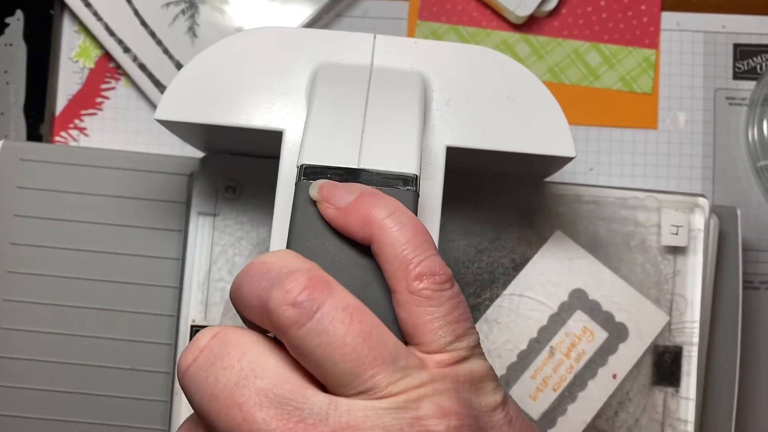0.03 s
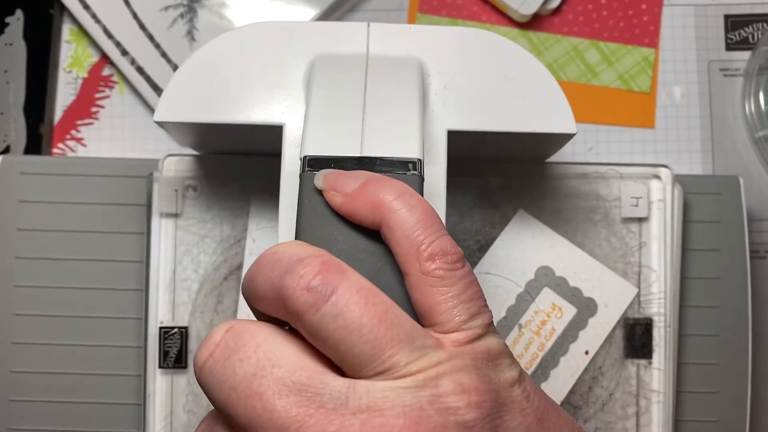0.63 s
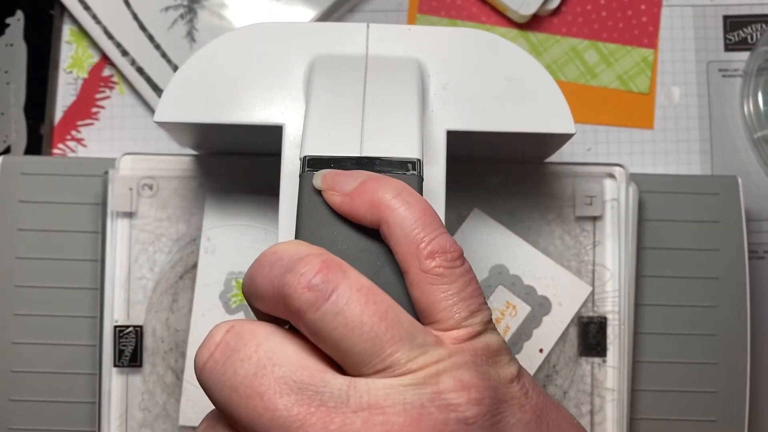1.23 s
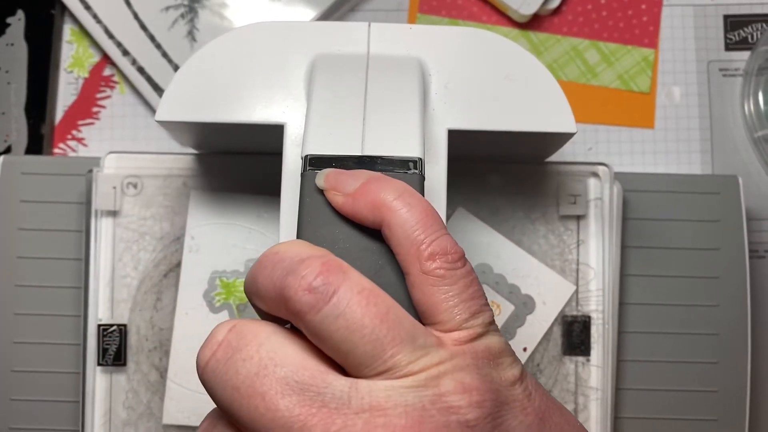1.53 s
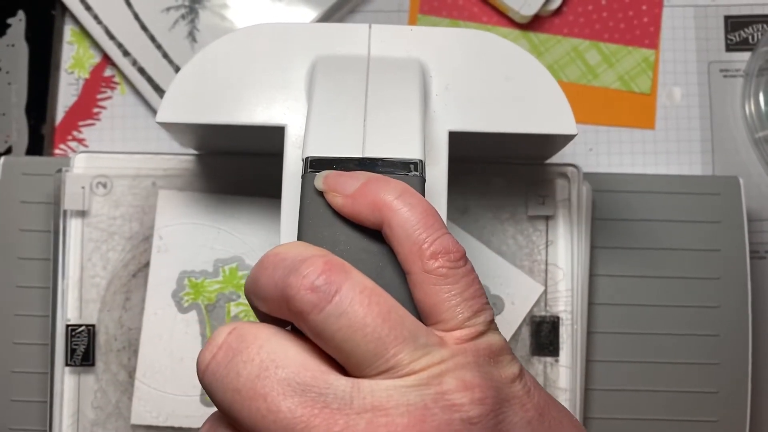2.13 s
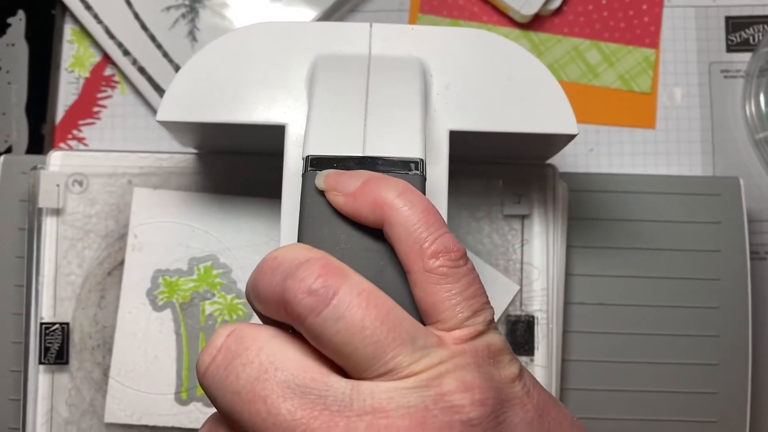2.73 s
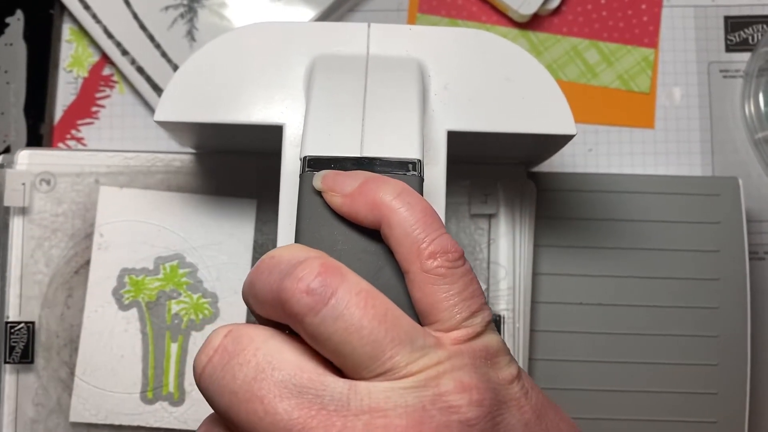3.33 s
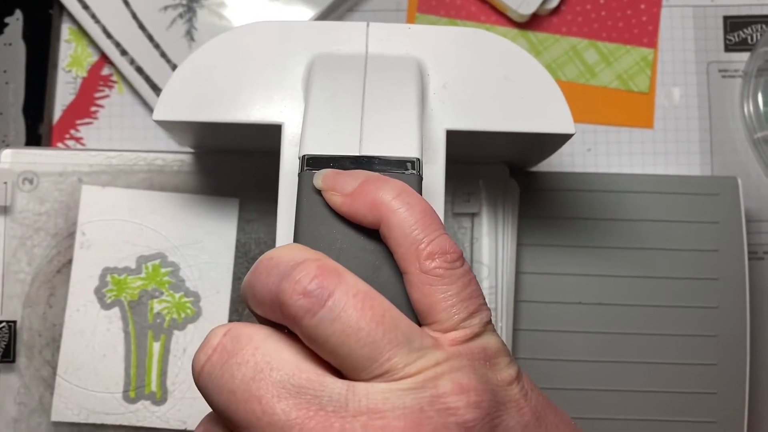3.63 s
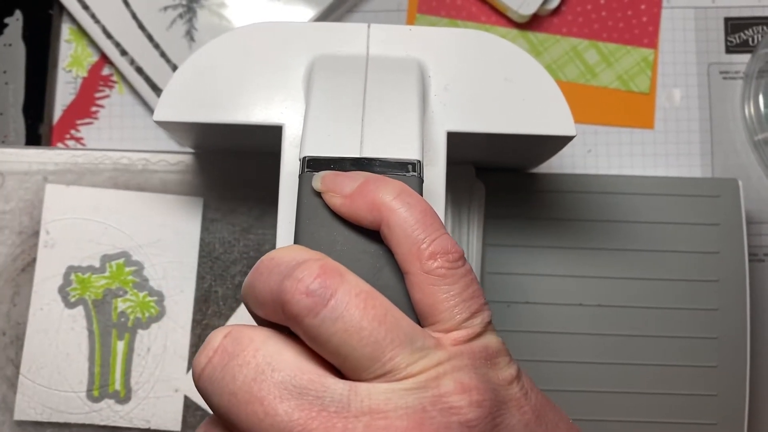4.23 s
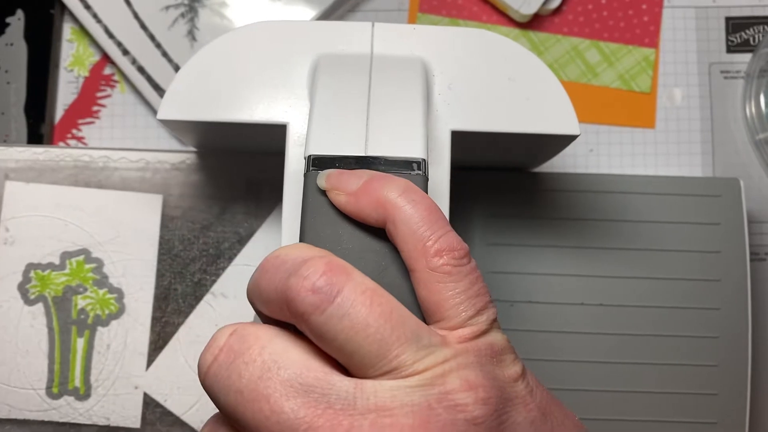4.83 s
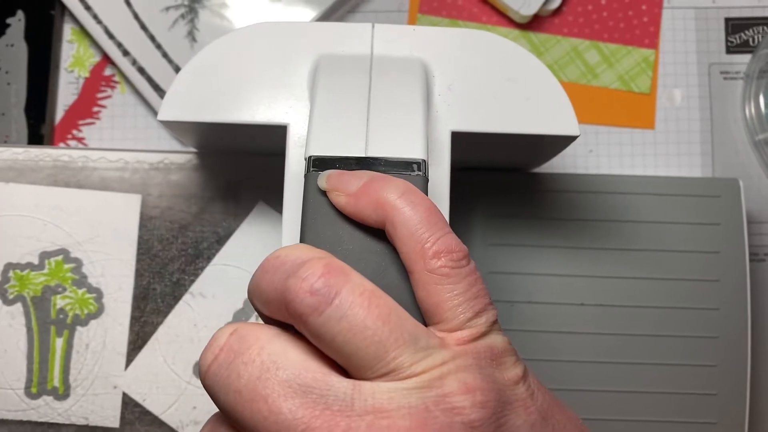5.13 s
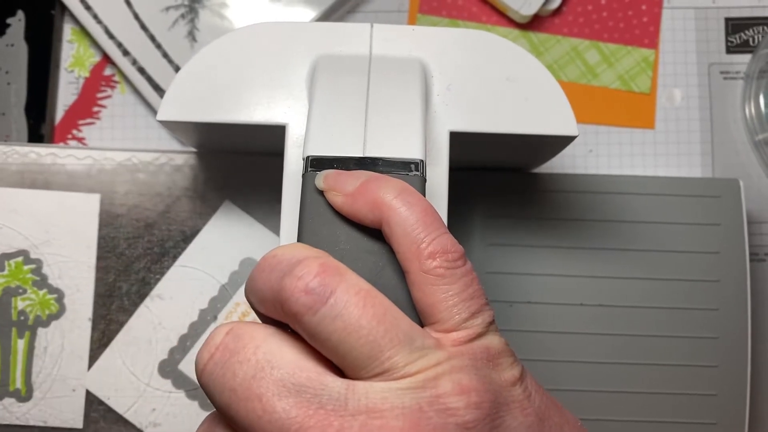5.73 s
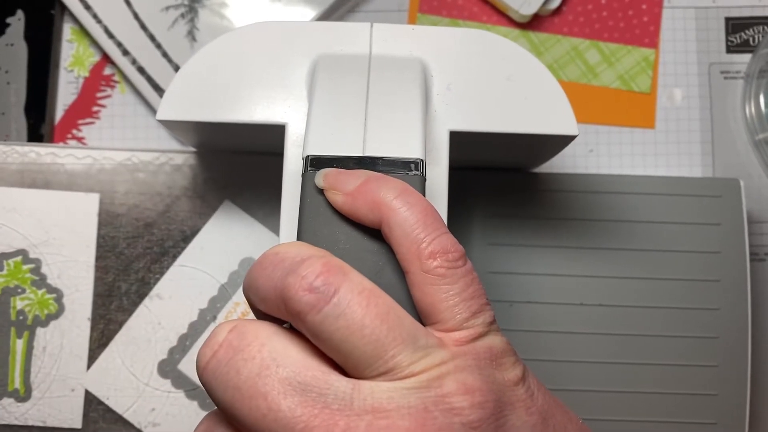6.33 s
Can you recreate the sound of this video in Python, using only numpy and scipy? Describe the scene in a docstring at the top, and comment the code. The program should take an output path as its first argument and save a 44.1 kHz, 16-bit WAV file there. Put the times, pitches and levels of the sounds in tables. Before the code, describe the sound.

A hand-cranked die-cutting machine works close to the microphones in a small, softly reflecting room. From the start its rollers give a low, uneven rumble, and the gear teeth tap and ring in short runs with each push of the crank. A stack of plastic plates slides over the bed with a faint hiss, giving scattered dry ticks and brief creaks. After a lighter knock at 0.8 seconds, the stack clunks hard against the housing at about 1.1 seconds. A quieter stretch of rumbling, ticking and small knocks follows, with a dull rub near 3.5 seconds. The loudest clunk lands at 4.6 seconds with a bright metallic snap, and another heavy one comes at 5.4 seconds. Sharper ticks continue, and the rumble is strongest at the very end, around 6.5 seconds.

```python
"""A hand-cranked die-cutting machine on a craft table in a small room, close to a pair of microphones.
From the start the rollers rumble, a stack of plastic plates slides over the bed and the gear teeth ring
one after another, while the squeezed plastic ticks and creaks. As the steel dies and the plate ends pass
the nip, the stack clunks against the housing: hard at about 1.1 s, hardest at 4.6 s, again at 5.4 s.
The rumble is strongest at the very end, and the walls answer softly throughout."""
import sys
import numpy as np
from scipy import signal
from scipy.fft import rfft, irfft, next_fast_len
from scipy.io import wavfile
from scipy.ndimage import uniform_filter1d, map_coordinates

SR = 44100
rng = np.random.default_rng(int(sys.argv[2]) if len(sys.argv) > 2 else 0)


def put_to_file(sound):
    """Save the sound as 16-bit audio at rate SR, in the file named by the first command-line argument."""
    columns = np.atleast_2d(sound).T  # one column per channel
    safe = np.clip(columns, -1, 1)
    whole_steps = np.round(safe * 32767)
    wavfile.write(sys.argv[1], SR, whole_steps.astype(np.int16))


N = 285970
AGE = np.arange(SR // 2) / SR  # seconds since a contact

# modes of the housing on the table: pitch_hz, level_db, t60_s
HOUSING_MODES = [(62, -19, .3), (92, -12.5, 0.13), (165.9, 1.5, 0.31), (208.6, -6, 0.22),
                 (230.6, -6.5, 0.18), (287.2, 2.5, 0.17), (366, -16.5, 0.27), (450.6, -2, 0.1),
                 (562.2, -7.5, 0.54), (594, 3, 0.12)]
# modes of the squeezed plastic: pitch_hz, level_db, t60_s
PLASTIC_MODES = [(1150, -7, .012), (1450, -2, .012), (1780, 0, .015), (2200, -2, .012), (3300, -6, .008),
                 (5900, -11, .01)]
# the plates' slide over the bed, with a lull at each turn of the crank: time_s, level_db
SLIDE_LEVELS = [(0, -60.5), (0.17, -69.5), (0.5, -74.5), (0.66, -73.5), (1.05, -71), (1.27, -97.5),
                (1.48, -71.5), (1.8, -78.5), (2.14, -88.5), (2.28, -68.5), (2.6, -79.0), (2.7, -65.5),
                (3.0, -79), (3.18, -84), (3.35, -66.5), (3.7, -76.5), (3.95, -76.0), (4.17, -83),
                (4.3, -71.5), (4.55, -66), (4.9, -73.5), (5.08, -66.5), (5.3, -80), (5.6, -67.5),
                (5.95, -69), (6.22, -84), (6.36, -72), (6.48, -77)]
# spectrum of a clack of the plates: frequency_hz, level_db
CLACK_SPECTRUM = [(200, -23.5), (430, 1), (600, -1.5), (950, 7), (1300, -1.5), (1850, 0), (2500, -7.5),
                  (3200, -3.5), (4000, -9), (8000, -19), (16000, -52.5)]
# spectrum of a bright snap: frequency_hz, level_db
SNAP_SPECTRUM = [(500, -30), (2000, -6), (3100, -4), (4200, -9), (5800, -6), (6500, -1), (7200, 2),
                 (8400, -15), (9700, -9), (10600, -1), (12000, -20), (14500, -17), (16000, -32)]
# spectrum of a dry tick in the plastic: frequency_hz, level_db
TICK_SPECTRUM = [(200, -21.5), (600, -5), (1100, -5.5), (2000, -2), (3700, 2), (5000, -3.5), (7000, -9.5),
                 (8500, -29), (16000, -31)]


def amp(db):
    """Decibels to gain."""
    return 10 ** (np.asarray(db) / 20)


def unit(x):
    """Scaled to rms 1."""
    return x / np.sqrt(np.mean(x ** 2) + 1e-20)


def crest(x, size):
    """Scaled so that its loudest stretch of size samples has rms 1."""
    return x / np.sqrt(uniform_filter1d(x ** 2, size, mode="constant").max() + 1e-20)


def along(points, hz):
    """Interpolate (frequency_hz, value) points on a log axis."""
    frequencies, values = np.transpose(points)
    return np.interp(np.log(hz + 1), np.log(frequencies + 1), values)


def curve(points):
    """Interpolate (time_s, value) points at every sample."""
    return np.interp(np.arange(N) / SR, *np.transpose(points))


def wobble(rate):
    """A smooth random curve, rate knots a second."""
    return map_coordinates(rng.standard_normal(int(N * rate / SR) + 4), [np.arange(N) * rate / SR])


def swells(rows, attack_s, release_s):
    """Gain of (start_s, length_s, level_db) events: each rises, holds and dies away."""
    t = np.arange(N) / SR
    return sum(amp(db) * np.exp(-np.maximum(s - t, 0) / attack_s - np.maximum(t - s - hold, 0) / release_s)
               for s, hold, db in rows)


def filtered(x, response):
    """x through a complex frequency response."""
    size = next_fast_len(x.shape[-1] + 8192)
    return irfft(rfft(x, size) * response(np.fft.rfftfreq(size, 1 / SR)), size)[..., :x.shape[-1]]


def shaped(x, spectrum):
    """x through a causal filter of the given spectrum, at rms 1."""
    def response(hz):
        cepstrum = irfft(np.log(amp(along(spectrum, hz))))
        half = len(cepstrum) // 2
        return np.exp(rfft(np.r_[cepstrum[0], 2 * cepstrum[1:half]], 2 * half))
    return unit(filtered(x, response))


def softened(x, corner_hz):
    """A soft contact passes nothing much above its corner."""
    return signal.lfilter(*signal.butter(2, min(corner_hz, SR / 3), fs=SR), x)


def rise(seconds):
    """A contact takes a moment to build up its force."""
    return 1 - np.exp(-(AGE / seconds) ** 2)


def fade(t60):
    """Free decay after a contact, 60 dB in t60 seconds."""
    return np.exp(-np.log(1000) * AGE / t60)


def ring(modes, scatter_db):
    """The modes of a struck part, at new strengths for every blow."""
    return sum((-1) ** k * amp(db + scatter_db * rng.standard_normal())
               * fade(t60) * np.sin(2 * np.pi * hz * AGE) for k, (hz, db, t60) in enumerate(modes))


def burst(spectrum, t60, tail_db, tail_t60):
    """Dense unresolved modes: a fast first decay and a weaker long one."""
    return shaped(rng.standard_normal(len(AGE)) * (fade(t60) + amp(tail_db) * fade(tail_t60)), spectrum)


def grains(rate, spread):
    """Random tiny contacts of uneven size, rate a second."""
    return (rng.random(N) < rate / SR) * rng.standard_normal(N) * np.exp(spread * rng.standard_normal(N))


def add(track, s, sound):
    """Lay a sound into a track at s seconds."""
    start = max(0, round(s * SR))
    span = track[start:start + len(sound)]
    span += sound[:len(span)]


def rollers():
    """Small bumps under the rollers shake the housing; the table sways, more when the hand bears down."""
    # rumble from the load on the rollers: time_s, level_db
    load = [(0, -47.5), (0.3, -53), (0.75, -48.5), (1.0, -49.5), (1.5, -51), (1.8, -60.0), (2.15, -50),
            (2.55, -57.5), (3.0, -55.5), (3.45, -48.0), (3.72, -52.5), (4.05, -52.5), (4.5, -47),
            (4.8, -44), (5.25, -47), (5.6, -42), (6.0, -51), (6.25, -50), (6.48, -37.5)]
    # spectrum of the grinding rollers: frequency_hz, level_db
    grind_spectrum = [(25, -20.5), (55, -1), (110, -8.5), (165, -0.5), (220, 0), (290, -9.5), (450, -7),
                      (620, -12), (800, -18.5), (1300, -36), (2500, -63)]
    # the hand bearing down: start_s, length_s, level_db
    heaves = [(.36, 0.053, -48.5), (2.79, 0.063, -49), (3.96, 0.051, -50), (4.63, 0.09, -38),
              (5.46, 0.59, -52.5), (6.4, .04, -50)]
    # spectrum of the swaying table: frequency_hz, level_db
    sway_spectrum = [(25, -31.5), (45, -12.5), (60, 0.5), (78, -14), (98, 11), (120, -3.5), (200, -32),
                     (400, -75.5)]
    rumble_db = curve(load)
    bumps = grains(rate=160, spread=.2) * amp(2.5 * wobble(18))
    ringing = signal.fftconvolve(bumps, ring(HOUSING_MODES, scatter_db=0))[:N]
    # soft bumps favour the low modes
    shaken = shaped(ringing, [(90, -9), (165, 0), (215, -6), (290, -5.5), (600, -6), (1500, -25)])
    grind = amp(-7 + 2.5 * wobble(25)) * shaped(rng.standard_normal(N), grind_spectrum)
    sway_gain = np.hypot(amp(rumble_db - 11.5), swells(heaves, attack_s=.04, release_s=.05))
    sway = sway_gain * shaped(rng.standard_normal(N), sway_spectrum)
    return amp(rumble_db - 2) * (shaken + grind) + sway


def sliding():
    """The plates hiss over the bed on thousands of tiny contacts a second."""
    # spectrum of the hiss: frequency_hz, level_db
    hiss_spectrum = [(300, -1), (900, 10), (1900, -2), (2300, 2.5), (2800, -5), (4800, -8.5), (5400, -9.5),
                     (5900, -14), (7200, -15), (8500, -23.5), (10500, -9), (12000, -35), (14500, -12.5),
                     (16000, -28.5)]
    hiss = amp(1.2 * wobble(33)) * shaped(grains(rate=6000, spread=.2), hiss_spectrum)
    return amp(curve(SLIDE_LEVELS) + 4) * hiss


def grit(per_second=11):
    """Faint dull ticks come at random, following the level of the sliding."""
    out = np.zeros(N)
    slide_db = curve(SLIDE_LEVELS)
    for i in np.flatnonzero(rng.random(N) < per_second / SR):
        crack = crest(burst(TICK_SPECTRUM, t60=.012, tail_db=-8, tail_t60=.06), size=45)
        hollow = crest(ring(PLASTIC_MODES, scatter_db=4), size=45)
        add(out, i / SR, amp(slide_db[i] + 9 + 3 * rng.standard_normal()) * (crack + hollow))
    return softened(out, corner_hz=3200)


def teeth(plate_ticks):
    """(start_s, level_db) of each gear jolt: an even pace through each push, and one at each tick."""
    # pushes on the crank: first_tooth_s, last_tooth_s, tooth_count, first_db, last_db
    pushes = [(0.014, 0.276, 4, -41.5, -46.5), (0.461, 0.679, 4, -53.5, -53.5),
              (1.43, 1.722, 6, -53, -59.5), (1.908, 2.217, 5, -59, -42), (2.33, 2.932, 9, -62.5, -64),
              (3.072, 3.248, 4, -49, -48), (3.277, 3.307, 2, -41, -40.5), (3.376, 3.497, 3, -56, -53.5),
              (3.897, 4.326, 9, -45.5, -52.5), (4.971, 5.106, 4, -45.5, -49), (5.19, 5.369, 4, -56, -48.5),
              (5.581, 5.83, 5, -43.5, -52.5)]
    jitter_s, scatter_db = .002, 1.2
    hard_tick_db, hard_jolt_db = -31, -44.5  # weaker ticks jolt the gears far less
    meshing = np.vstack([np.linspace((first_s, first_db), (last_s, last_db), round(count))
                         for first_s, last_s, count, first_db, last_db in pushes])
    meshing += rng.standard_normal(meshing.shape) * [jitter_s, scatter_db]
    return list(meshing) + [(s, hard_jolt_db + 1.3 * (db - hard_tick_db)) for s, db, _ in plate_ticks]


def gears(plate_ticks):
    """Each tooth taps, nudges the housing and, loading up, rings the gears at a slightly new pitch."""
    # modes of the gear train: pitch_hz, level_db, t60_s
    gear_modes = [(614, 0, .06), (592, -25, .24), (668, -12, .05), (965, -22, .06)]
    out = np.zeros(N)
    for s, db in teeth(plate_ticks):
        detune = 1 + .018 * rng.standard_normal()
        tone = sum(amp(level) * fade(t60) * np.sin(2 * np.pi * hz * detune * AGE)
                   for hz, level, t60 in gear_modes)
        loaded = crest(tone * rise(.02), size=450)
        contact = burst(CLACK_SPECTRUM, t60=.022, tail_db=-24, tail_t60=.22) * rise(.003)
        tap = crest(softened(contact, corner_hz=1500), size=110)
        housing = ring(HOUSING_MODES, scatter_db=2) * rise(.004)
        nudge = crest(softened(housing, corner_hz=400), size=450)
        add(out, s, amp(db) * (loaded + amp(-10.5) * tap + amp(-11.5) * nudge))
    return out


def ticks(plate_ticks):
    """The squeezed plastic lets go in short dry ticks, each followed by a weaker slip as it settles."""
    # spectrum of a tick's sharp edge: frequency_hz, level_db
    edge_spectrum = [(2000, -25), (6500, -3), (8400, -8), (9400, 0), (11000, 0), (12000, -10), (13500, 0),
                     (15000, -3), (16000, -14)]
    out = np.zeros(N)
    for s, tick_db, edge_db in plate_ticks:
        settle_s = .022 * rng.uniform(.44, 2)
        settle_db = -18.5 + 2 * rng.standard_normal()
        for delay_s, drop_db in [(0, 0), (settle_s, settle_db)]:
            crack = crest(burst(TICK_SPECTRUM, t60=.0097, tail_db=-6, tail_t60=.075), size=45)
            hollow = crest(ring(PLASTIC_MODES, scatter_db=4), size=45)
            edge = crest(burst(edge_spectrum, t60=.006, tail_db=-16, tail_t60=.07), size=45)
            tick = amp(tick_db - 4.5) * (crack + amp(-10) * hollow) + amp(edge_db + 3.5) * edge
            add(out, s + delay_s, amp(drop_db) * tick)
    return out


def creaks():
    """The stack creaks in quick uneven slips as the rollers squeeze it."""
    # squeezes that creak: start_s, length_s, level_db
    squeezes = [(.068, 0.013, -56), (.275, 0.047, -59), (.348, 0.024, -52), (2.22, .05, -64),
                (3.26, 0.026, -61.5)]
    slips = grains(rate=4400, spread=.45) * amp(1.5 * wobble(88))
    squeak = unit(signal.fftconvolve(slips, ring(PLASTIC_MODES, scatter_db=1))[:N])
    crackle = amp(-5.5) * shaped(slips, SNAP_SPECTRUM) + amp(-8) * shaped(slips, TICK_SPECTRUM)
    return swells(squeezes, attack_s=.006, release_s=.028) * (squeak + crackle)


def bend(x, lag_s, corner_hz):
    """Bending waves carry the treble first and the bass last, so each blow chirps downward."""
    return filtered(x, lambda hz: np.exp(-2j * np.pi * lag_s * corner_hz * np.arctan(hz / corner_hz)))


def knocks():
    """Each blow thumps the housing and clacks the plates; hard ones are brighter and snap the die."""
    # blows of the stack on the housing: start_s, thud_db, clack_db, snap_db
    blows = [(0.344, -50, -43, -67), (.818, -36, -43, -86), (1.0652, -42, -34.5, -33),
             (1.0785, -28, -26.5, -24), (1.108, -33.5, -45.5, -31), (1.131, -40.5, -35, -51),
             (1.168, -49, -49, -69), (1.278, -39.5, -41.5, -96), (1.546, -39.5, -57.5, -68),
             (1.841, -50, -68.5, -78.5), (2.065, -56.5, -52, -105), (2.151, -52, -43.5, -95.5),
             (2.221, -45.5, -47, -49), (2.495, -47.5, -68, -67), (2.632, -48, -53.5, -64),
             (3.503, -44.5, -62, -68), (3.952, -38, -67, -77), (4.33, -41.5, -58, -79),
             (4.597, -24, -38, -45), (4.612, -45.5, -21, -23), (4.6144, -21.5, -24.5, -15.5),
             (4.627, -50, -30, -48), (5.068, -40, -43.5, -89.5), (5.428, -38.5, -42, -66),
             (5.4489, -19.5, -23, -31), (5.708, -44.5, -46, -67), (5.88, -42.5, -49, -56),
             (6.397, -43, -58, -77), (6.453, -35, -44, -57)]
    # modes of the plate stack: pitch_hz, level_db, t60_s
    stack_modes = [(775, -12, .08), (974, 0, .14), (1170, -11, .1), (1428, -5, .09), (1725, -7, .09),
                   (1855, -1, .11), (2265, -8, .1)]
    # modes of the steel die: pitch_hz, level_db, t60_s
    die_modes = [(6620, -3, .06), (6950, -2, .035), (7130, 0, .04), (7350, -4, .035), (10020, -12, .04),
                 (10520, -7, .04)]
    # spectrum of the housing's thud: frequency_hz, level_db
    thud_spectrum = [(25, -44), (60, -17.5), (130, -8.5), (200, -5.5), (450, -1), (700, -5.5), (1100, -12),
                     (3000, -92)]
    body, bright = np.zeros(N), np.zeros(N)
    # the first wave of a contact goes straight through the machine
    impulse = 1. * (AGE == 0)
    push = crest(shaped(impulse, thud_spectrum), size=350)
    rap = crest(shaped(impulse, CLACK_SPECTRUM), size=110)
    for s, thud_db, clack_db, snap_db in blows:
        housing = crest(ring(HOUSING_MODES, scatter_db=1.5) * rise(.00057), size=350)
        stack = crest(ring(stack_modes, scatter_db=2) * rise(.001), size=110)
        steel = crest(ring(die_modes, scatter_db=1.5), size=45)
        thump = crest(burst(thud_spectrum, t60=.036, tail_db=-24, tail_t60=.35), size=350)
        thud = housing + amp(-19) * push + amp(-4.5) * thump
        thud = softened(thud, corner_hz=1100 * amp(.7 * (clack_db - thud_db)))
        edge_echoes = burst(CLACK_SPECTRUM, t60=.078, tail_db=-13.5, tail_t60=.083) * rise(.0012)
        firmness = np.clip((clack_db + 42) / 22, 0, 1)  # a hard blow rattles the whole stack
        clack = rap + amp(-4.5) * stack + amp(-7 + 10 * firmness) * crest(edge_echoes, size=110)
        clack = softened(clack, corner_hz=4200 * amp(.29 * (snap_db - clack_db)))
        crack = crest(burst(SNAP_SPECTRUM, t60=.0086, tail_db=-23, tail_t60=.09), size=45)
        snap = (amp(-8.5) * steel + crack) * rise(.0006)
        add(body, s, amp(thud_db + 2) * crest(thud, size=350) + amp(clack_db) * crest(clack, size=110))
        add(bright, s, amp(snap_db - 2) * crest(snap, size=45))
    return bend(body, lag_s=.015, corner_hz=594) + bright


def rubs():
    """Three times a plate rubs along the bed, duller and grainier than the hiss."""
    # strokes of a plate on the bed: start_s, length_s, level_db
    strokes = [(.68, 0.29, -64), (3.43, 0.22, -62), (4.4, .22, -61)]
    # spectrum of the rubbing: frequency_hz, level_db
    rub_spectrum = [(400, -39), (720, 7.5), (950, 10.5), (1180, -1.5), (1400, -10.5), (3000, -22),
                    (6000, -40)]
    friction = amp(2 * wobble(50)) * shaped(grains(rate=2500, spread=.35), rub_spectrum)
    return swells(strokes, attack_s=.035, release_s=.06) * friction


def room(x):
    """The walls answer each microphone with a different short tail; the bass dies first."""
    # decay of the small room: frequency_hz, t60_s
    decay = [(100, 0.22), (600, 0.33), (3000, 0.39), (8000, 0.34), (15000, 0.54)]
    hz, t, noise = signal.stft(rng.standard_normal((2, SR // 2)), SR, nperseg=256)
    tail = signal.istft(noise * amp(-60 * t / along(decay, hz)[:, None]), SR, nperseg=256)[1]
    delayed = np.pad(x, (300, 0))[None]
    return signal.fftconvolve(delayed, tail / np.linalg.norm(tail[0]), axes=1)[:, :N]


def microphones(x):
    """The near machine reaches the two microphones with a different phase and level."""
    # level of the left microphone over the right: frequency_hz, level_db
    tilt = [(60, 0), (700, .3), (1300, -.3), (2400, 2), (4400, 2.8), (7500, -.5), (15000, .3)]
    # phase lead of the left over the right: frequency_hz, phase_rad
    lead = [(40, -.4), (160, -.9), (300, -.65), (600, -.95), (860, .95), (1400, .8), (3200, .85),
            (7000, .75), (9500, -1.2), (14000, -1.6)]

    def response(hz):
        left = amp(along(tilt, hz) / 2) * np.exp(.5j * along(lead, hz))
        return np.array([left, 1 / left])
    return filtered(x, response)


def scene():
    """The machine close up, the walls behind it and the quiet air."""
    # the clearest ticks of the strained plates, which also jolt the gears: start_s, tick_db, edge_db
    plate_ticks = [(0.015, -41, -52), (.066, -48.5, -60), (0.197, -52, -63), (0.219, -46.5, -73),
                   (0.266, -35.5, -50), (.29, -48, -52), (0.311, -39.5, -50), (.571, -48, -84),
                   (.6, -39, -62.5), (1.429, -39, -53), (2.194, -37, -55), (2.22, -37.5, -53.5),
                   (2.25, -44.5, -60), (2.274, -45, -62), (2.292, -46.5, -74.5), (2.379, -45, -70.5),
                   (2.736, -41.5, -74), (2.745, -40, -46), (2.839, -42, -61), (3.204, -47, -81.5),
                   (3.254, -39.5, -58), (3.281, -42.5, -63), (3.305, -41.5, -59), (3.369, -40, -58),
                   (3.793, -45.5, -65.5), (3.823, -47.5, -81), (3.888, -48, -76), (4.698, -32, -50),
                   (4.999, -36, -50.5), (5.191, -36, -52), (5.239, -39, -69), (5.254, -45.5, -64),
                   (5.522, -34.5, -60), (5.624, -33.5, -51.5), (5.716, -33.5, -51.5), (5.868, -34, -51),
                   (5.896, -43.5, -64), (5.968, -32, -52), (6.257, -47, -67), (6.31, -30.5, -49.5),
                   (6.456, -38.5, -61)]
    # spectrum of the room tone: frequency_hz, level_db
    air_spectrum = [(15, -45.5), (25, -1.5), (170, -4.5), (489, -25), (607, -5.5), (754, -29.5),
                    (6740, -34), (8590, -46.5), (10400, -56.5), (14000, -37), (16000, -64)]
    machine = knocks() + ticks(plate_ticks) + grit() + gears(plate_ticks) + rollers()
    machine += sliding() + rubs() + creaks()
    air = amp(-68.5) * shaped(rng.standard_normal((2, N)), air_spectrum)
    return amp(1.2) * microphones(machine) + amp(-15) * room(machine) + air


def record(dry):
    """Both channels roll off steeply at the top of the treble."""
    top_hz = 16200
    return filtered(dry, lambda hz: 1 / np.sqrt(1 + (hz / top_hz) ** 120))


dry = scene()
out = record(dry)
put_to_file(out)
```